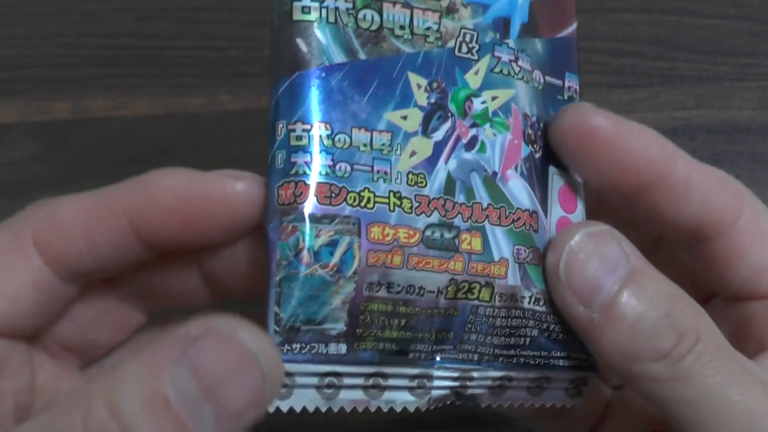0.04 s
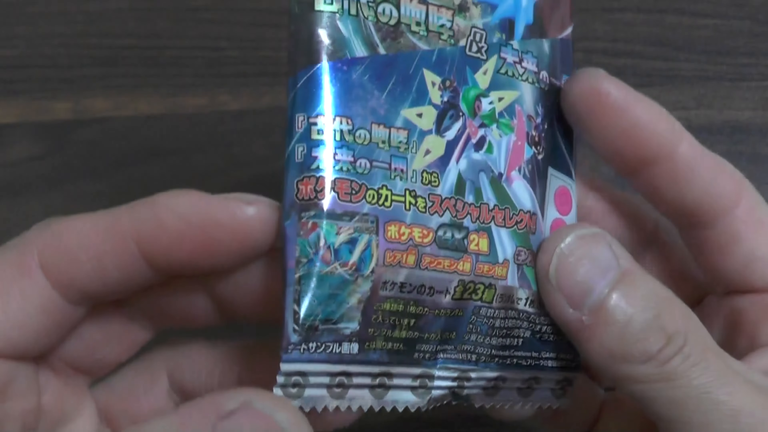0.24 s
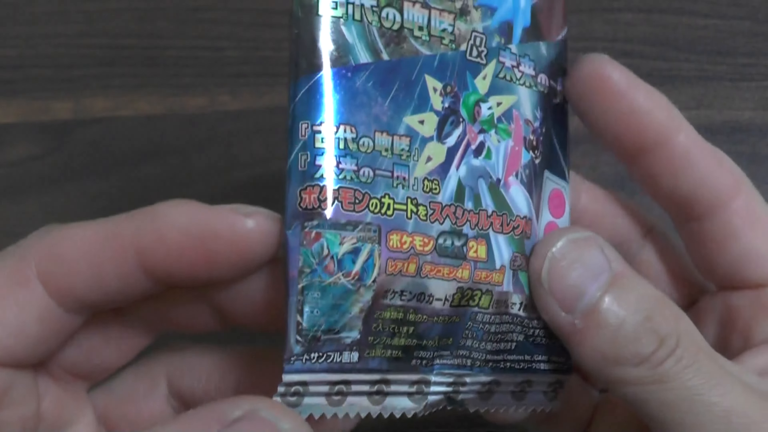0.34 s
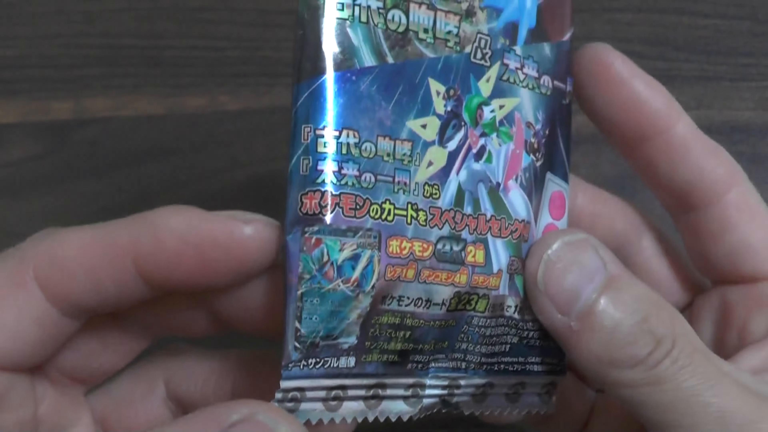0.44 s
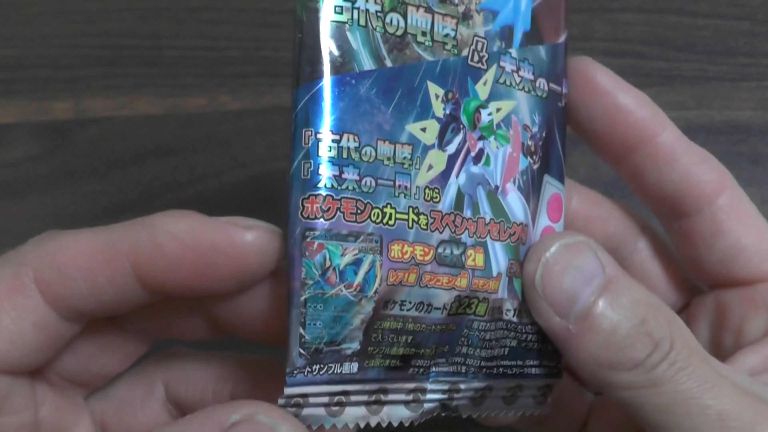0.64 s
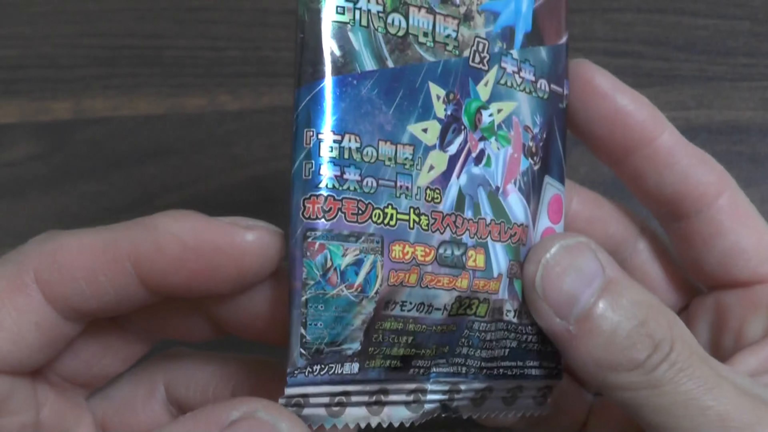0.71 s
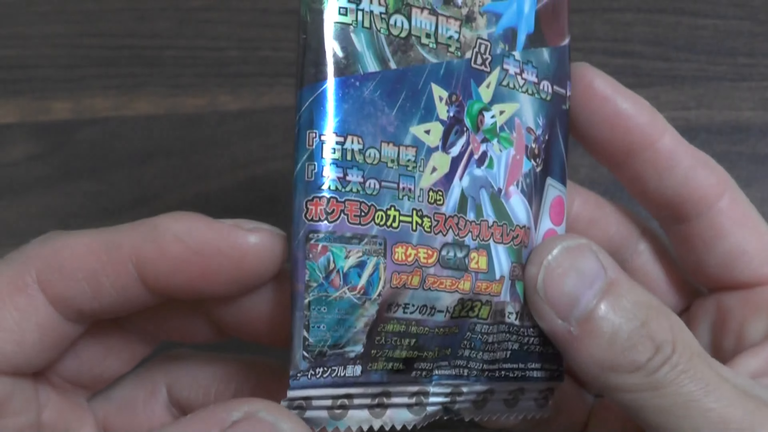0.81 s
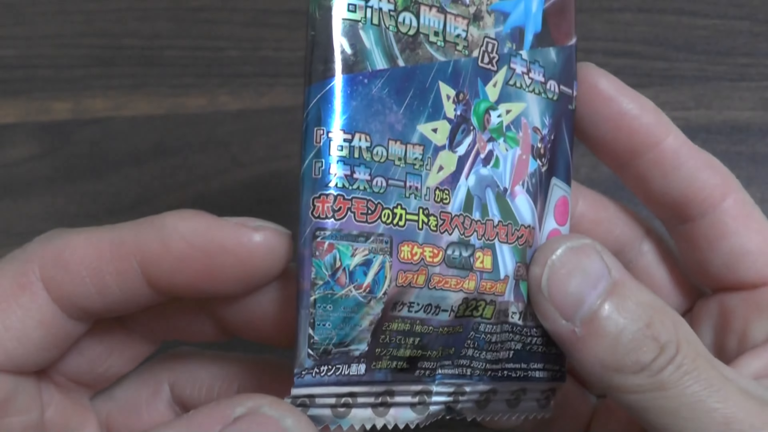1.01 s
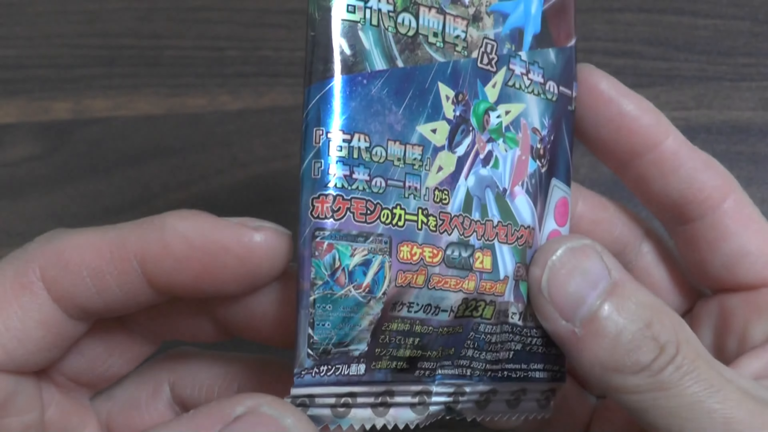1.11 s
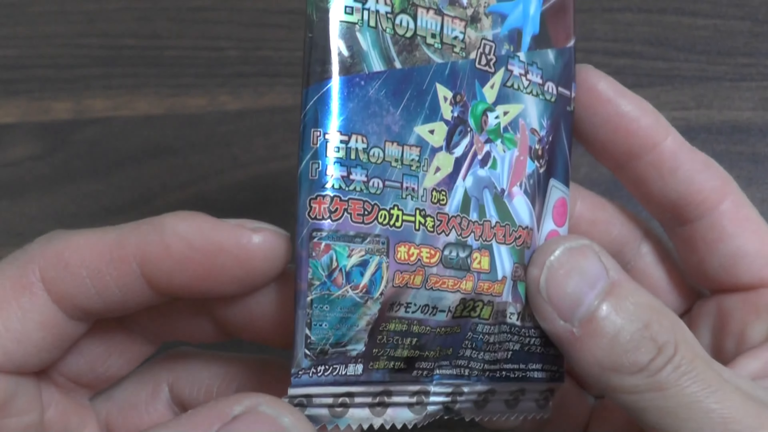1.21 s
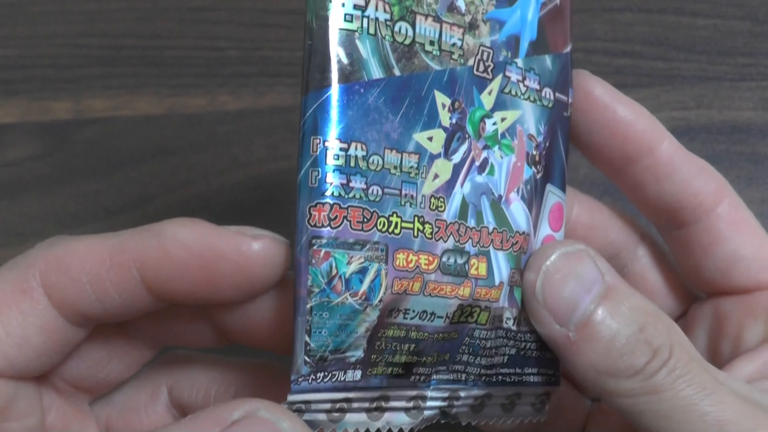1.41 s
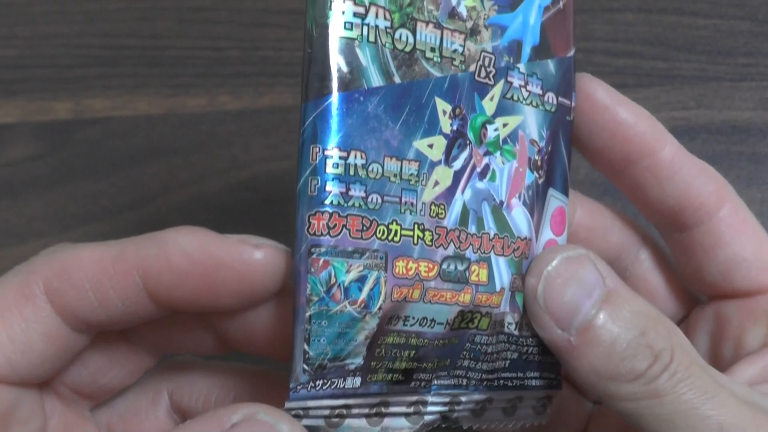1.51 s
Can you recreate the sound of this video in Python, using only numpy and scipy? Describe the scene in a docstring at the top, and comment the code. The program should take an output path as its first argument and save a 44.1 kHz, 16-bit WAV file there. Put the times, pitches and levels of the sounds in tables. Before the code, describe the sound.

A small foil packet rustles faintly under fingers, then gives one loud sharp snap and a few smaller crackles; close stereo microphone in a small room, with quiet hiss and a faint motor buzz throughout.

```python
"""Fingers slide over a foil packet close to two microphone ports in a small room, while a motor buzzes over hiss.
The rustle is a dense train of tiny creases, with skin friction, filtered by the moving resonance of the foil.
The motor is a series of odd harmonics that ring its housing; the hiss is coloured noise.
The room answers with reflections from table and walls and with a diffuse tail.
During and after the rubbing the foil snaps: a decaying crease tone, a bright tick and packet modes each time.
With the loudest snap the packet jolts and pushes air at the ports, a brief swing of pressure."""
import sys
import numpy as np
from scipy import signal
from scipy.fft import rfft, irfft
from scipy.io import wavfile

SR = 44100
rng = np.random.default_rng(int(sys.argv[2]) if len(sys.argv) > 2 else 0)


def decibels_to_gain(level_db):
    """Convert a level in decibels to a linear amplitude gain (20 dB per decade)."""
    exponent = np.asarray(level_db, float) / 20
    return 10 ** exponent


def waveform_to_disk(signal):
    """Save audio, clipped to [-1, 1], as 16-bit WAV at the path in sys.argv[1]."""
    frames = np.transpose(np.atleast_2d(signal))
    scaled = np.clip(frames, -1, 1) * 32767
    samples = np.round(scaled).astype(np.int16)
    wavfile.write(sys.argv[1], SR, samples)


N = 68355  # length [samples]


def rms_one(x):
    """Normalization: scale to an rms value of 1."""
    return x / np.sqrt(np.mean(x ** 2) + 1e-20)


def at_hz(points, hz):
    """Interpolation of a spectrum table, linear on a log-frequency axis."""
    table_hz, values = np.transpose(points)
    return np.interp(np.log(hz), np.log(table_hz), values)


def drift(rate_hz):
    """Random fluctuation: white noise through two equal one-pole low-passes, scaled to rms 1."""
    r = np.exp(-2 * np.pi * rate_hz / SR)
    noise = rng.standard_normal(N + SR)
    settled = signal.lfilter([1], [1, -2 * r, r * r], noise)[SR:]
    return rms_one(settled)


def high_pass(x, hz):
    """First-order high-pass: falls 6 dB per octave below its corner."""
    return signal.sosfilt(signal.butter(1, hz, "high", fs=SR, output="sos"), x)


def band(x, low_hz, high_hz):
    """Butterworth band-pass: maximally flat between its edges."""
    edges = [low_hz, min(high_hz, SR / 2.2)]
    return signal.sosfilt(signal.butter(2, edges, "band", fs=SR, output="sos"), x)


def ring(clicks, hz, t60):
    """Damped resonator: a unit click starts a sine of initial height 1 that falls 60 dB in t60 [s]."""
    r, w = decibels_to_gain(-60 / (t60 * SR)), 2 * np.pi * hz / SR
    return signal.lfilter([0, np.sin(w)], [1, -2 * r * np.cos(w), r * r], clicks + 1e-18)


def clicks_at(s, db):
    """Ideal impulses: single samples at the given times [s] and levels [dB]."""
    out = np.zeros(N)
    np.add.at(out, (np.atleast_1d(s) * SR).astype(int), decibels_to_gain(np.atleast_1d(db)))
    return out


def rustle():
    """Shot noise: random tiny creases and skin friction excite the moving resonance of the bent foil."""
    # fingers on the foil: (time [s], rustle level [dB], resonance centre [Hz],
    # treble re rustle [dB], low-mid re rustle [dB])
    rubs = [(0.0, -45, 3780, -2, -8), (0.054, -53.5, 3780, -8.5, -12.5), (0.11, -42, 3440, -5.5, -10),
            (0.138, -43.5, 2900, -8.5, -16), (0.184, -35.5, 3140, -11, -6), (0.21, -41, 3260, -12, -13.5),
            (0.262, -46.5, 3040, -15, -8), (0.276, -42, 3020, -17.5, -8), (0.298, -53, 3400, 7.5, -11),
            (0.326, -45.5, 3530, -8, -10), (0.348, -46, 3900, -6.5, -14.5), (0.388, -53.5, 3660, -0.5, -10),
            (0.39, -33.5, 3750, -5, -0.5)]
    # treble colour of the rustle: (frequency [Hz], gain [dB])
    sheen_gain = [(2940, -30), (5000, -9.5), (8570, -15), (10600, -20.5), (11400, -11.5), (12000, -17),
                  (15600, -47), (22000, -120)]
    rub_ends_s, fade_db_per_s = 0.3675, 405
    width_hz = 1410  # of the moving resonance
    grains_per_s, grain_spread_db = 3300, 1.5  # the rate swings about this value
    smooth, extra_smooth = 0.68, 3.7  # rms of steady noise beside grains of rms 1

    t = np.arange(N) / SR
    s, *columns = np.transpose(rubs)
    level_db, hz, treble_db, low_db = [np.interp(t, s, c) for c in columns]
    level_db = level_db - fade_db_per_s * np.maximum(t - rub_ends_s, 0)

    heights = decibels_to_gain(grain_spread_db * np.minimum(rng.exponential(1, N), 5))
    sizes = heights * rng.choice([-1, 1], N)
    born = rng.random(N) < grains_per_s * decibels_to_gain(3 * drift(40)) / SR
    grains = rms_one(sizes * born) + smooth * rng.standard_normal(N)
    silky = grains + extra_smooth * rng.standard_normal(N)

    # narrow bands of alternating sign, weighted by their distance from the resonance
    mid = np.zeros(N)
    for k, centre in enumerate(np.geomspace(2250, 6000, num=12)):
        weight = np.exp(-((centre - hz) / width_hz) ** 2)
        mid += weight * (-1) ** k * band(grains, centre / 1.06, centre * 1.06)

    sheen = np.zeros(N)
    edges = np.geomspace(5000, 12000, num=7)
    for k, (a, b) in enumerate(zip(edges, edges[1:])):
        gain = decibels_to_gain(at_hz(sheen_gain, np.sqrt(a * b)))
        sheen += gain * (-1) ** k * band(silky, a, b)

    low = band(silky, 980, 1680)
    # dragging skin: -64.5 dB at a rustle of -47 dB, with 0.4 of the rustle's swing in dB
    drag = decibels_to_gain(-64.5 + 0.4 * (level_db + 47)) * rms_one(band(silky, 248, 654))
    foil = rms_one(mid) + decibels_to_gain(treble_db) * rms_one(sheen) + decibels_to_gain(low_db) * rms_one(low)
    return drag + decibels_to_gain(level_db) * foil


def motor():
    """Forced resonance: two opposite knocks a turn, hence odd harmonics only, ring the housing."""
    # housing resonances: (frequency [Hz], width [Hz], level [dB])
    housing = [(943.5, 59, -71), (1740, 87, -72.5), (2019, 63, -68.5), (2294, 41, -73.5), (2900, 40, -78.5),
               (3660, 150, -73.5), (3781, 87, -60.5)]
    motor_hz, turn_begins_s = 29.97, 0.0031  # turns per second, instant of phase zero
    waver_db = 3  # rms of each resonance's level fluctuation

    turn = 2 * np.pi * motor_hz * (np.arange(N) / SR - turn_begins_s)
    out = np.zeros(N)
    for hz, width_hz, db in housing:
        k = np.arange(1, 160, 2)
        answer = (1 / (1 + 2j * (k * motor_hz - hz) / width_hz)) ** 2
        strongest = np.argsort(-np.abs(answer))[:8]
        tone = np.real(answer[strongest] @ np.exp(1j * k[strongest, None] * turn))
        out += decibels_to_gain(db + waver_db * drift(6.7)) * tone
    return out


def hiss():
    """Partly coherent stereo noise: mid and side shares set the left-right correlation per frequency."""
    # noise colour: (frequency [Hz], relative spectral level [dB])
    colour = [(15, -37), (25, -3.5), (75, 0), (163, -5), (216, 0.5), (560, -9.5), (687, -5.5), (844, -9.5),
              (936, -6.5), (1060, -8.5), (1410, -14), (1730, -10.5), (1870, -16.5), (2020, -5.5),
              (2180, -14.5), (2550, -17), (2900, -7.5), (3470, -11), (3750, -3), (4150, -13), (5100, -21.5),
              (5950, -17), (8310, -23), (10200, -14.5), (11600, -17), (15100, -43), (22000, -120)]
    # left-right correlation: (frequency [Hz], coefficient [-1 to 1])
    likeness = [(60, 0.77), (130, 0.65), (270, -0.18), (590, -0.18), (1260, 0.65), (2690, 1), (5770, 0.88),
                (12300, 1)]

    hz = np.maximum(np.arange(N // 2 + 1) * SR / N, 1)
    alike = np.clip(at_hz(likeness, hz), -1, 1)
    mid, side = rfft(rng.standard_normal((2, N))) * decibels_to_gain(at_hz(colour, hz))
    spectra = np.sqrt(1 + alike) * mid + np.sqrt(1 - alike) * side * [[1], [-1]]
    return decibels_to_gain(-59) * rms_one(irfft(spectra, N))


def room(x):
    """Convolution with a room response: discrete reflections and a diffuse tail, nearly alike in both ports."""
    # reflections from table and walls: (delay [s], level [dB])
    echoes = [(.0046, -24.5), (0.0101, -27.5), (0.0117, -26.5), (.028, -23.5)]
    t60_s, builds_s = 0.26, 0.0088
    tail_db, side_db = -13.5, -15.5  # tail before its grain is applied, side re mid
    grain_db = 2.5  # rms of the mid tail's level fluctuation

    t = np.arange(SR // 2) / SR
    shape = (1 - np.exp(-t / builds_s)) * decibels_to_gain(-60 * t / t60_s)
    shape = decibels_to_gain(tail_db) * shape / np.sqrt(np.sum(shape ** 2))
    mid, side = rng.standard_normal((2, len(t))) * shape
    mid = mid * decibels_to_gain(grain_db * (drift(240)[:len(t)] - 1))
    for s, db in echoes:
        mid[int(s * SR)] += decibels_to_gain(db)

    x = high_pass(x, 303)
    x = x + decibels_to_gain(-3) * high_pass(x, 5160)  # lifted treble
    mid, side = signal.fftconvolve(x[None], np.array([mid, side]), axes=1)[:, :N]
    return mid + decibels_to_gain(side_db) * side * [[1], [-1]]


def snaps():
    """Impulse excitation: a flipping crease rings at its pitch and sets foil and packet modes decaying."""
    # snaps: (time [s], level [dB], crease pitch [Hz], tick re level [dB],
    # high, middle and low packet modes re level [dB])
    snap_table = [(0.1418, -27.5, 2980, -17, -18, -22.5, -50),
                  (0.1776, -22.5, 2840, -15.5, -34, -22.5, -13.5), (0.2025, -21, 2940, -15, -38, -44, -49),
                  (.211, -41, 3000, -21, -18, -20, -45.5), (0.226, -32, 2700, -38, -29, -28, -33),
                  (0.2388, -38, 2730, -13.5, -23, -21, -14), (0.25, -32.5, 2780, -39, -21.5, -21, -25),
                  (.276, -33, 2690, -38, -14, -11.5, -9), (.328, -28.5, 3580, -27.5, -25.5, -22, -11.5),
                  (.3953, -4.5, 4455, -7, -58, -47.5, -26.5),
                  (0.4839, -10.5, 3635, -8, -19.5, -22.5, -23.5),
                  (0.4857, -19.5, 3560, -3.5, -9.5, -36, -18.5), (0.5451, -15, 3710, -26, -12, -22.5, -28),
                  (0.5574, -20.5, 4230, -8.5, -21.5, -11.5, -27)]
    # packet modes: (frequency [Hz], level [dB], t60 [s])
    packet_modes = [(520, -8.5, 0.0123), (735, -4, 0.017), (1258, -2.5, .016), (1744, -2, .012),
                    (2060, -10.5, 0.0078)]
    # treble modes of the foil: (frequency [Hz], level [dB], t60 [s])
    foil_modes = [(5300, -3.5, 0.0061), (6640, 1.5, 0.0035), (7390, -1.5, 0.0057), (8380, -6, 0.004),
                  (9510, 0, 0.0045), (11350, -11, 0.0034)]
    crease_cycles, crease_width = 12.2, 1.71  # cycles to fall 60 dB, ratio of band edge to pitch
    crease_db, tick_db, packet_db = 3.5, 3.5, 3.5  # added to the table's levels; tick_db to noise only
    tick_t60_s = 0.006

    t = np.arange(N) / SR
    creases, bright, body = np.zeros((3, N))
    noise = rng.standard_normal(N)
    # random strike of every mode at every snap [dB]
    strike = rng.normal(0, 6.3, (len(snap_table), len(packet_modes) + len(foil_modes)))
    for (s, db, hz, treble_db, *body_db), luck in zip(snap_table, strike):
        crease = ring(clicks_at(s, db + crease_db), hz, crease_cycles / hz)
        for _ in range(2):
            crease = band(crease, hz / crease_width, hz * crease_width)
        creases += crease

        decay_db = -60 * np.abs(t - s) / tick_t60_s
        bright += noise * decibels_to_gain(db + treble_db + tick_db + decay_db) * (t >= s)
        for k, ((f, g, t60), d) in enumerate(zip(foil_modes, luck[len(packet_modes):])):
            bright += ring(clicks_at(s, db + treble_db + g + d), f, t60) * (-1) ** (k + 1)

        for (f, g, t60), d in zip(packet_modes, luck):
            group_db = body_db[2 - np.searchsorted((1000, 1500), f)]  # low, middle, high split at these Hz
            body += ring(clicks_at(s, db + group_db + packet_db + g + d), f, t60)
    return creases + band(bright, 4800, 11100) + band(body, 420, 2430)


def push():
    """Pressure relaxation: a quick drop recovers exponentially and slowly swings past rest."""
    # jolts of the packet that push air at the ports: (time [s], level [dB])
    jolts = [(.3956, -21)]
    rise_hz, fall_hz, swing_hz = 1460, 59, 4.5
    clicks = clicks_at(*np.transpose(jolts)) + 1e-18
    drop = signal.lfilter([-1], [1, -np.exp(-2 * np.pi * fall_hz / SR)], clicks)
    rounded = signal.sosfilt(signal.cheby1(3, 1, rise_hz, fs=SR, output="sos"), drop)
    return high_pass(rounded, swing_hz)


def scene():
    """Superposition: packet a little left of centre, jolt, room, motor and hiss add linearly."""
    near = snaps() + rustle()
    jolt = push()
    # first-order delay: left 3.5 microseconds early, right as much late; left +0.2 dB, right -0.2 dB
    shifted = near - 3.5e-6 * SR * np.gradient(near) * [[-1], [1]]
    direct = shifted * decibels_to_gain(0.2 * np.array([[1], [-1]]))
    return direct + jolt + room(near + jolt) + motor() + hiss()


def top_cut(x):
    """Nothing passes above the cut-off."""
    return signal.sosfilt(signal.butter(12, 12940, fs=SR, output="sos"), x)


def record(dry):
    """Band limitation: a seventh-order elliptic low-pass cuts steeply above 11640 Hz."""
    low_pass = signal.ellip(7, 0.5, 38, 11640, fs=SR, output="sos")
    finished = signal.sosfilt(low_pass, dry)
    return top_cut(finished)


dry = scene()
out = record(dry)
waveform_to_disk(out)
```